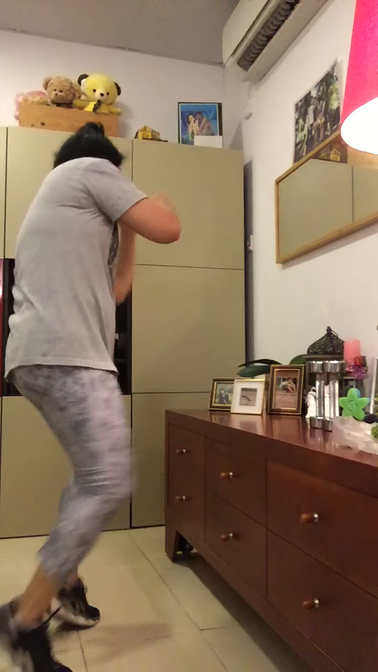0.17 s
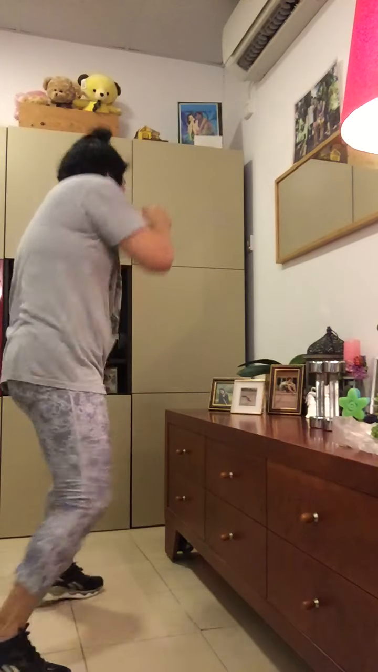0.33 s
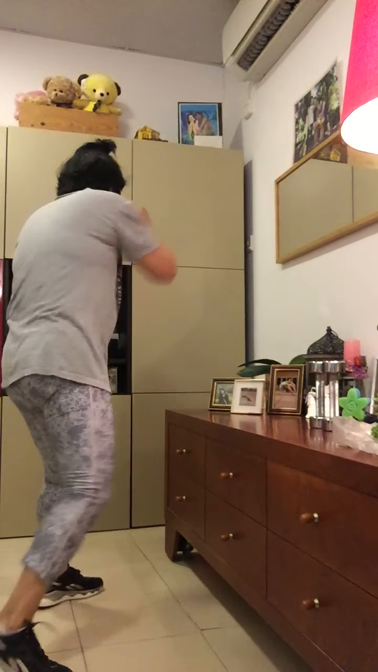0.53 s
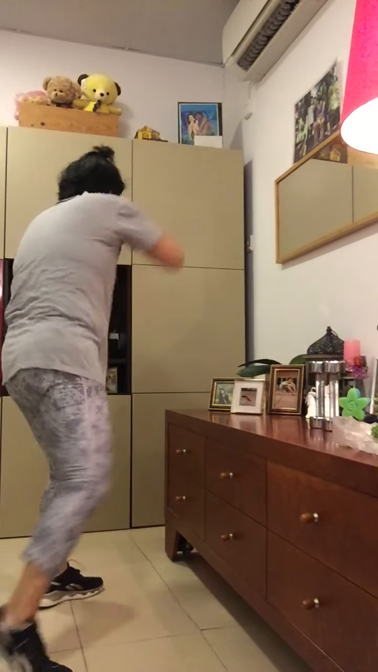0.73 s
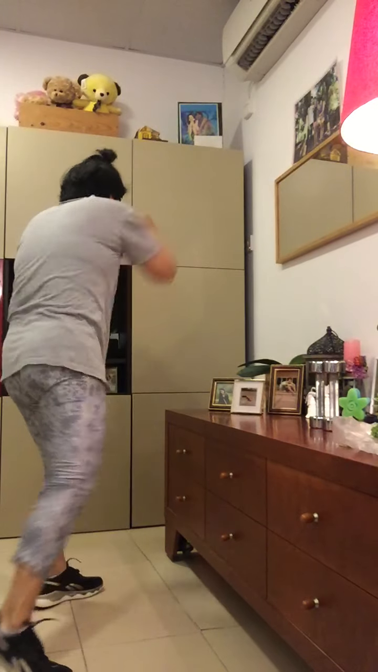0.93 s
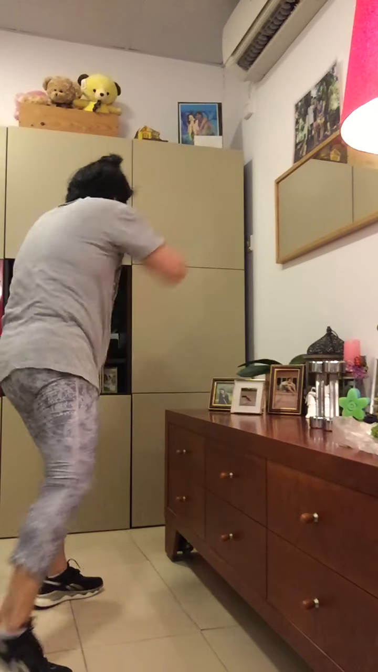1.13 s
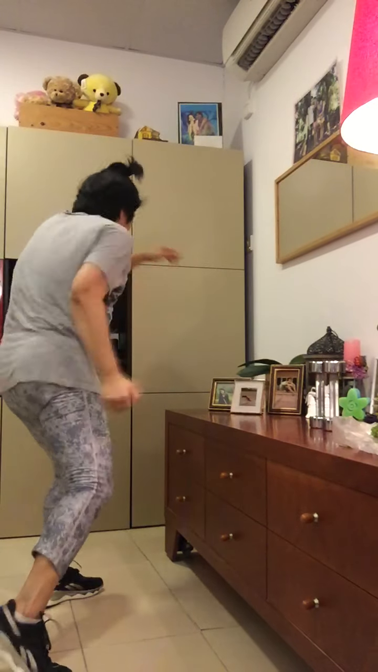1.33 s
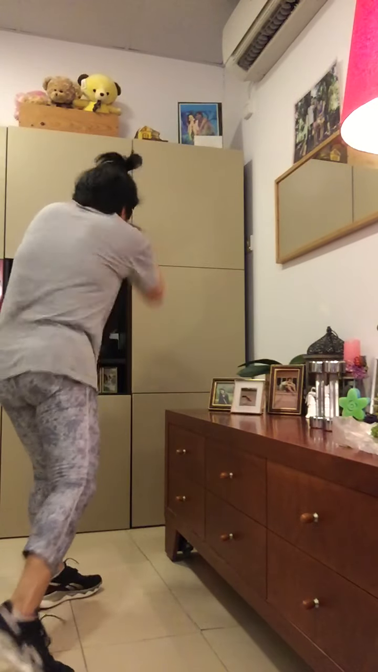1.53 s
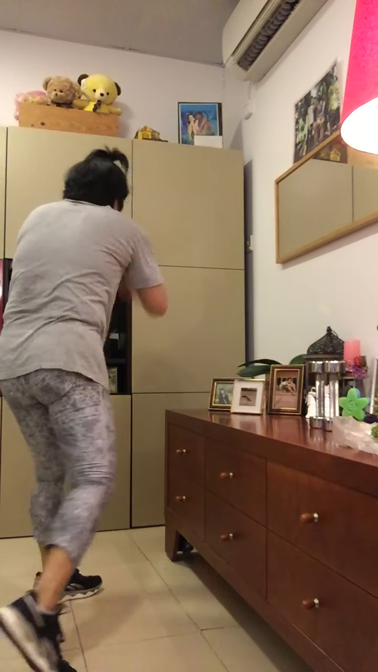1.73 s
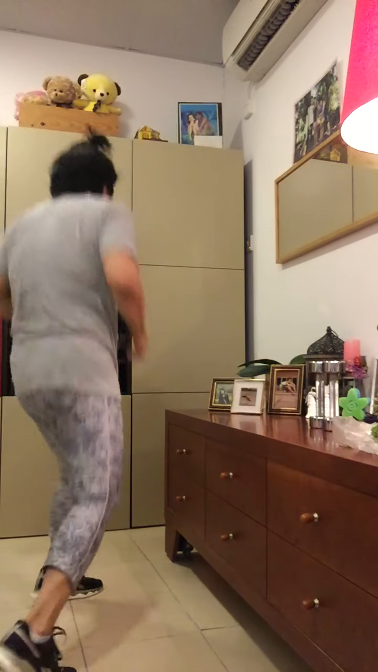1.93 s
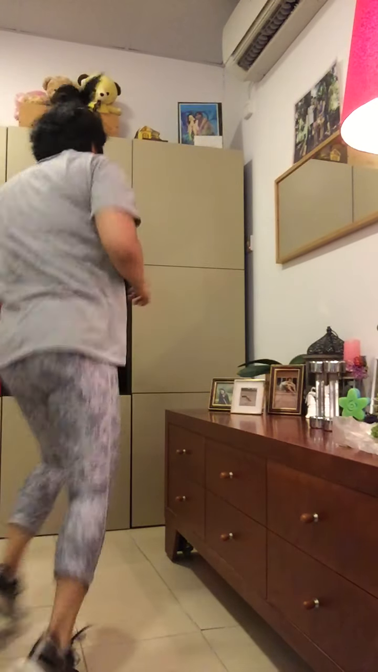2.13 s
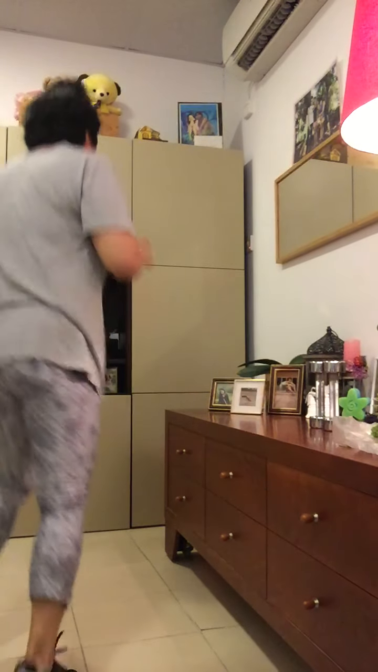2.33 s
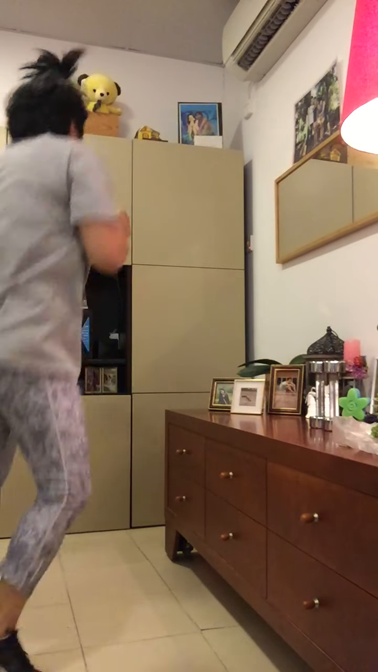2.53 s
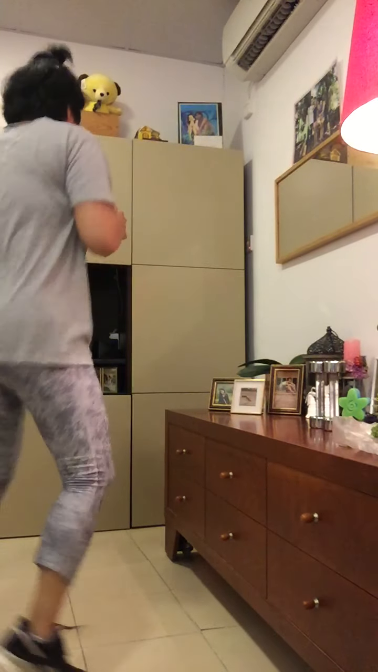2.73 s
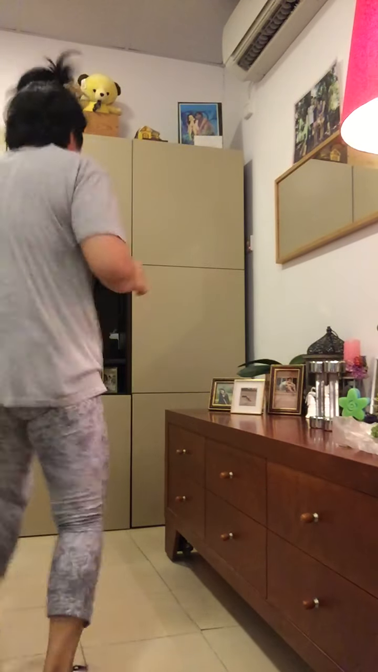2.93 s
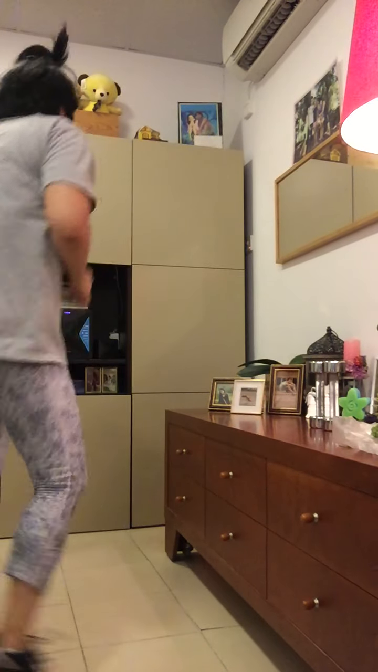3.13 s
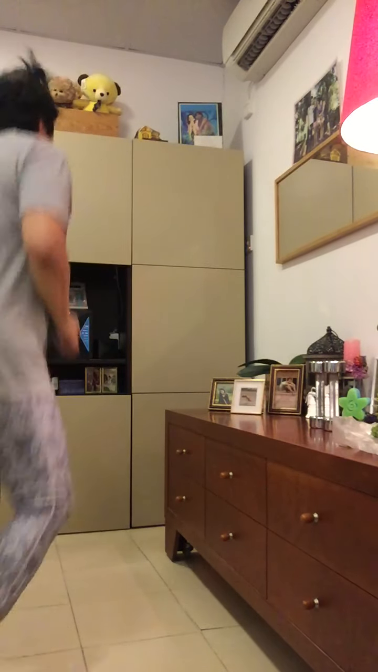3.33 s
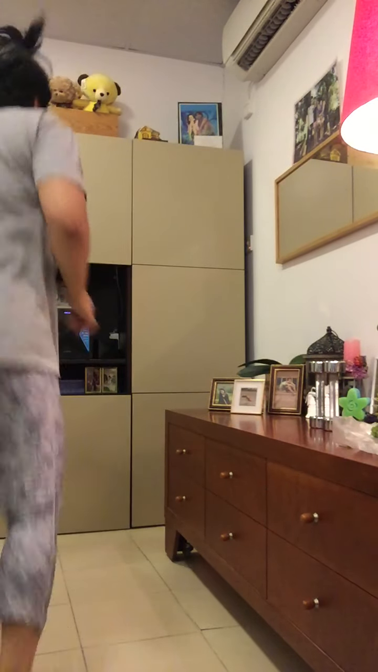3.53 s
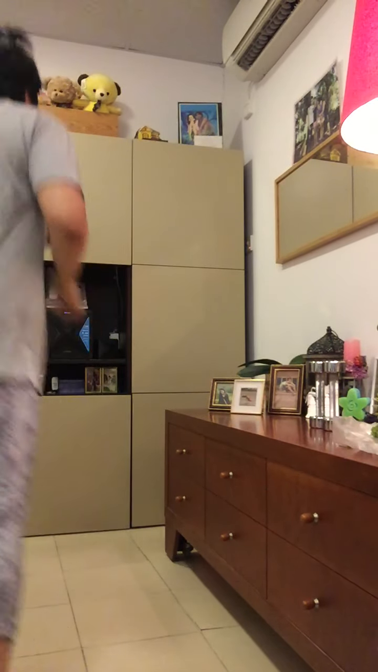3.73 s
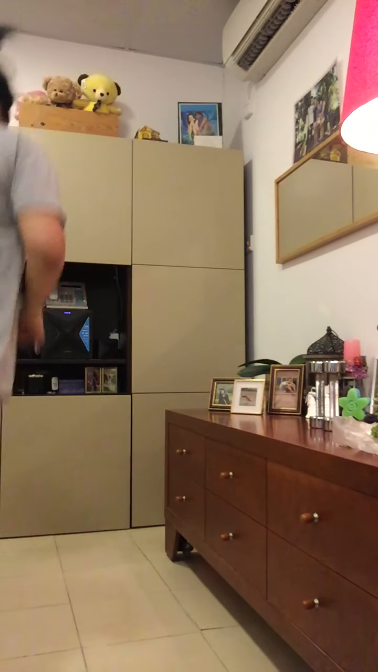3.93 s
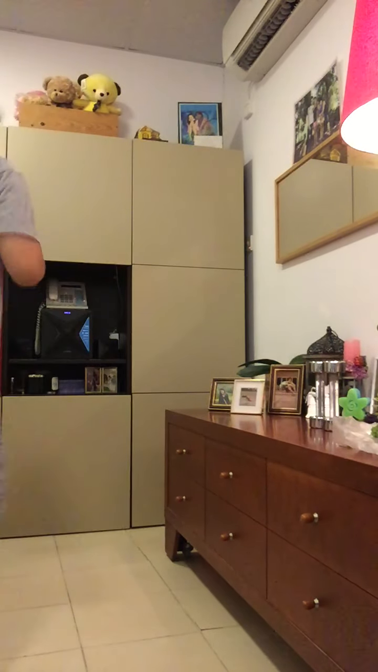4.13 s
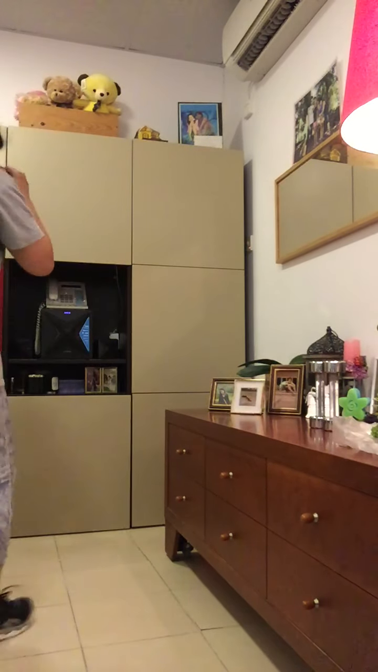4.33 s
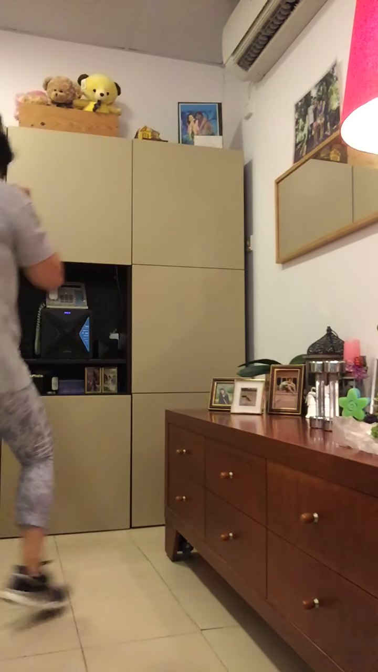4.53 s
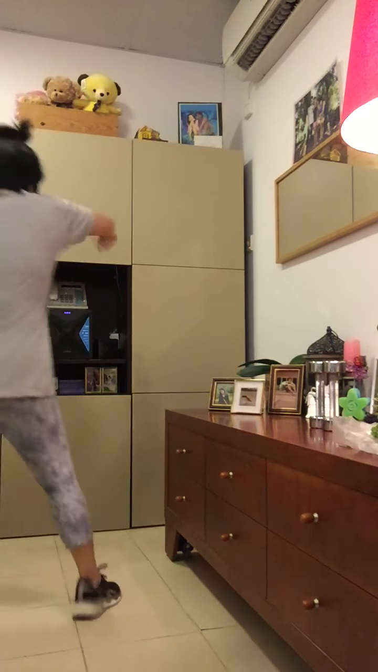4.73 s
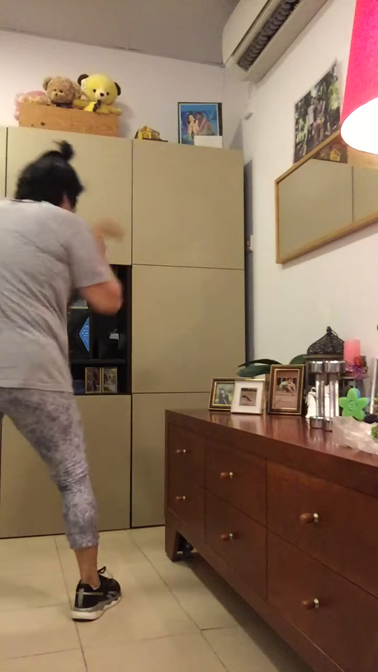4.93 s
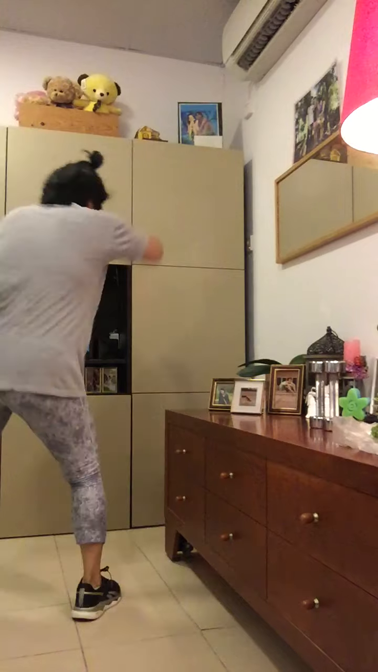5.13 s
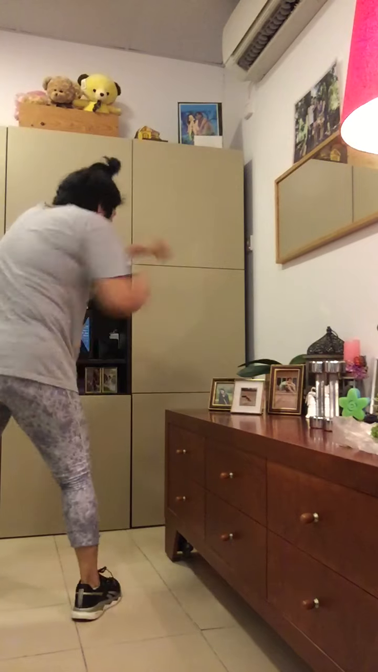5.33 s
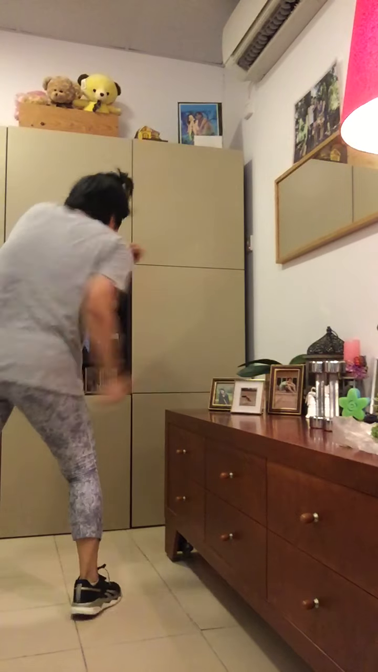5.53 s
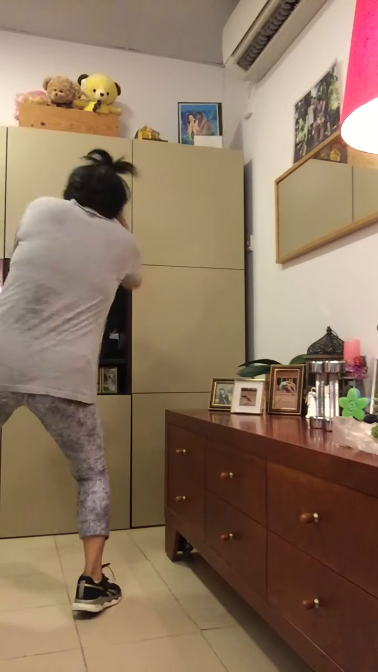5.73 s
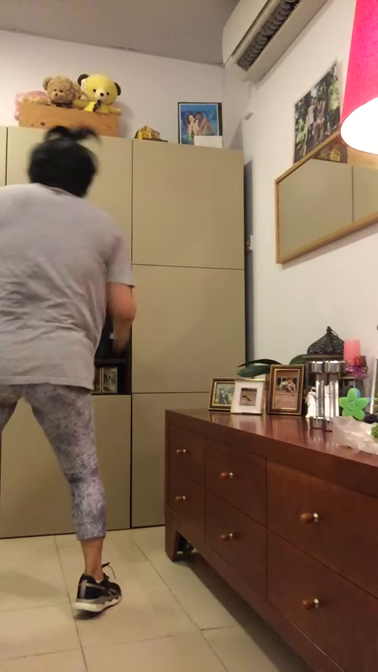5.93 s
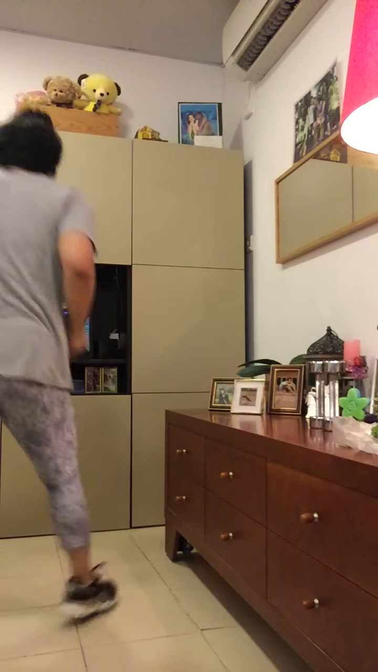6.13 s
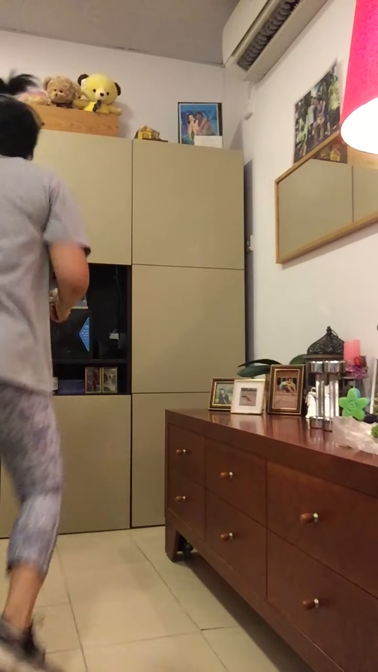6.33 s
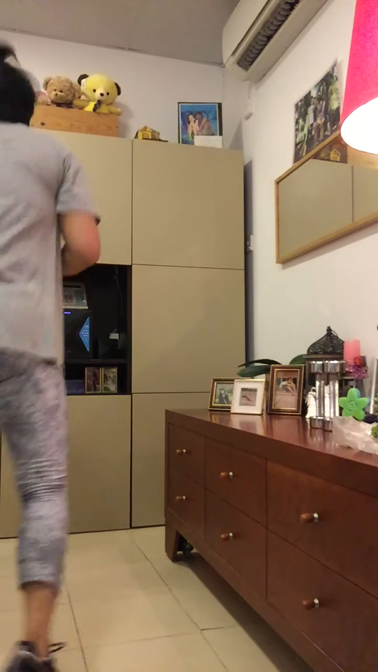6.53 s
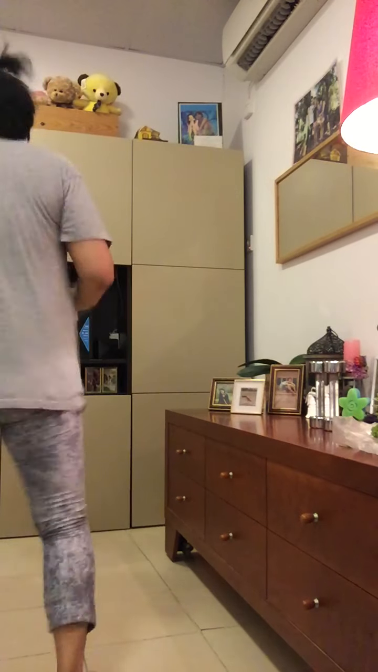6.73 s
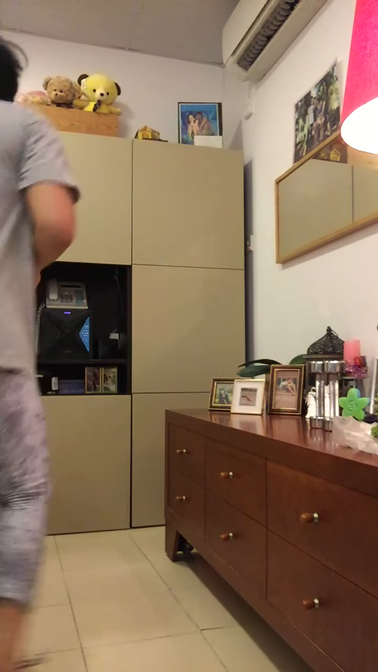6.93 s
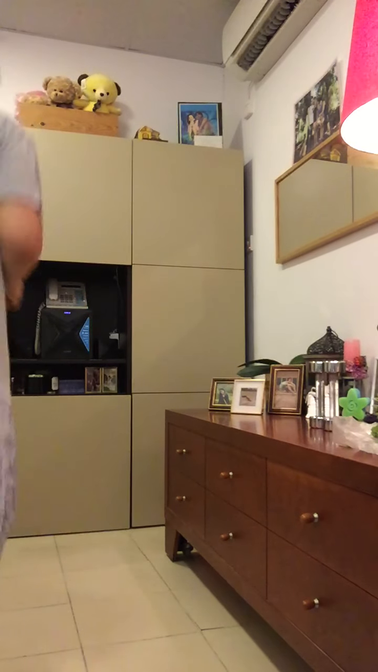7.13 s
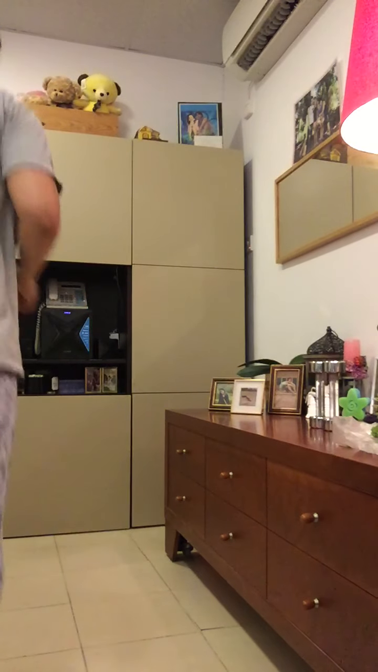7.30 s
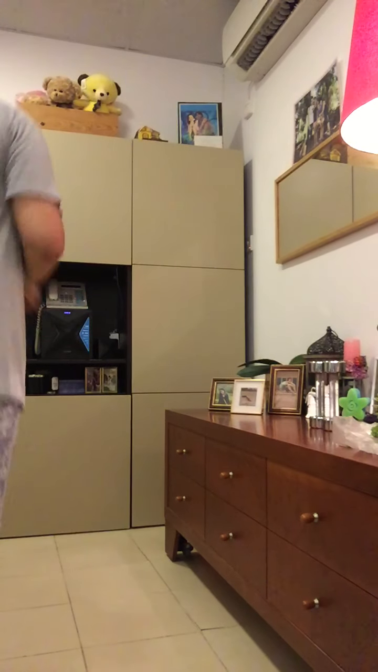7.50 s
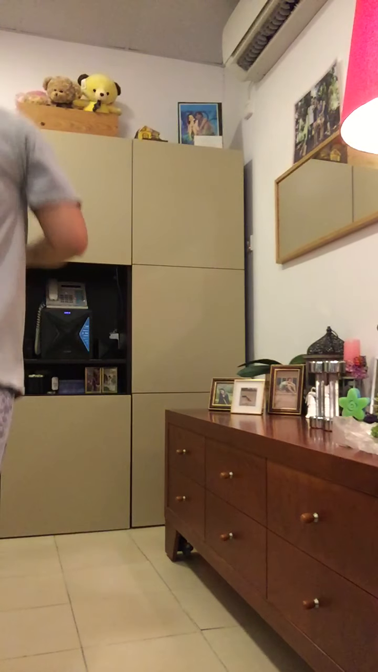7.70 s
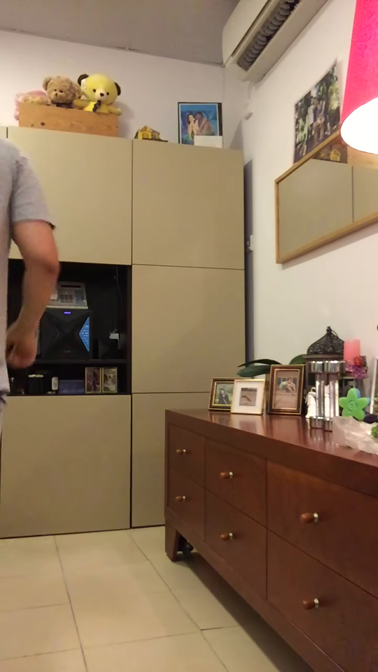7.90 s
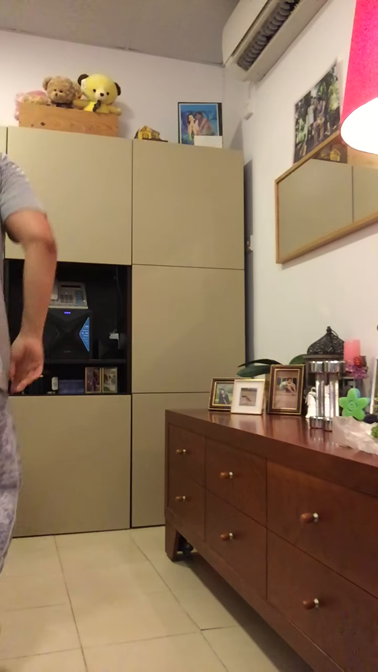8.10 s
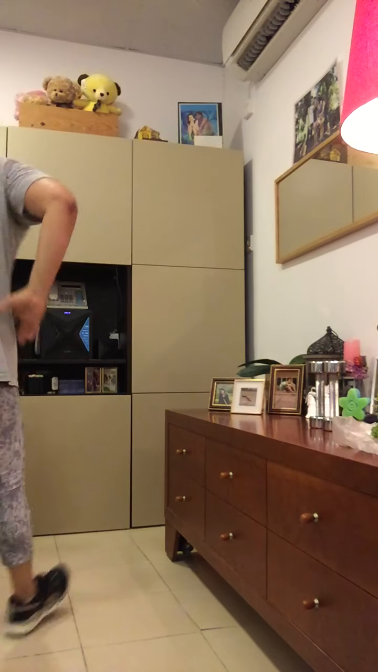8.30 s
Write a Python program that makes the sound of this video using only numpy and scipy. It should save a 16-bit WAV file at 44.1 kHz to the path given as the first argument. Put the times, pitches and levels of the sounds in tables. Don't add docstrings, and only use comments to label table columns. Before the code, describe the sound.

Someone in rubber-soled trainers works out on a tiled floor. Faint scuffs and light taps open, with one tiny sharp tick, then a bright double squeak and firm steps near two and a half seconds. More squeaks and slaps follow around four, a near-quiet stretch, then a busy burst near seven and soft taps to finish. Small hard room, close reflections, low air hum, microphone a few steps away.

```python
import sys
import numpy as np
from scipy import signal
from scipy.fft import rfft, irfft, next_fast_len
from scipy.io import wavfile
from scipy.ndimage import uniform_filter1d, map_coordinates

SR = 44100
rng = np.random.default_rng(int(sys.argv[2]) if len(sys.argv) > 2 else 0)


def voltage_ratio(level):
    return 10 ** (np.asarray(level, float) / 20)


def dump_mix(stems):
    frames = np.atleast_2d(stems).T
    limited = np.clip(frames, -1, 1)
    pcm = np.round(limited * 32767).astype(np.int16)
    wavfile.write(sys.argv[1], SR, pcm)


N = 373086
SHORT, LONG = 4096, 8192
TOP_HZ = 15850

# start in seconds, length in seconds, pitch in Hz, glide as a share of the pitch, level in dB.
THIN_CHIRPS = [
    (0.019, .018, 3210, -.04, -55),
    (.37, 0.0049, 3420, -0.012, -26.5),
    (3.156, 0.01, 3150, -.14, -30),
    (6.647, 0.0047, 2620, -0.1, -27.5),
    (3.939, 0.023, 5640, 0.014, -43),
    (7.329, .013, 4140, -0.063, -46),
]
MID_CHIRPS = [
    (3.173, 0.011, 2767, .016, -30),
    (6.986, 0.006, 2640, 0.098, -37.5),
    (6.993, 0.0056, 2982, -0.084, -26),
    (7.324, 0.02, 2705, -0.13, -25.5),
]
FIRM_CHIRPS = [
    (3.844, .031, 2557, -.24, -22),
    (4.477, 0.0218, 3283, .03, -27),
]
FULL_CHIRPS = [
    (2.482, 0.021, 2611, 0.057, -18),
    (2.496, 0.013, 2787, 0.06, -18.5),
    (3.842, 0.0062, 2620, -.05, -27),
]
# lower edge in Hz, upper edge in Hz.
BANDS = [(210, 500), (480, 1250), (1450, 3750), (4100, 6700), (7500, 14500)]
# time in seconds, rubbing level in dB.
EFFORT = [(0.0, -75), (.42, -59.5), (1.01, -86.5), (1.36, -73), (1.53, -70.5), (2.07, -65.5), (2.54, -59),
          (3.63, -65.5), (3.9, -58.5), (4.29, -66.5), (5.3, -77.5), (5.73, -70), (6.29, -77), (6.86, -52.5),
          (7.16, -68.5), (7.44, -62.5), (7.66, -74.5), (8.46, -74.5)]


def unit(x):
    return x / np.sqrt(np.mean(x ** 2) + 1e-20)


def along(points, hz):
    f, v = np.transpose(points)
    return np.interp(np.log(hz + 1), np.log(f + 1), v)


def effort_curve():
    s, level_db = np.transpose(EFFORT)
    return np.interp(np.arange(N) / SR, s, level_db)


def wobble(rate, size=N):
    return map_coordinates(rng.standard_normal(size // 8), [np.arange(size) * rate / SR])


def band(x, edges):
    return signal.sosfilt(signal.butter(3, edges, "band", fs=SR, output="sos"), x)


def add(track, s, sound, wet_db):
    # frequency in Hz, decay time to -60 dB in seconds.
    decay_times = [(150, 0.27), (600, 0.29), (2500, 0.3), (6000, 0.32), (12000, 0.25)]
    # delay in seconds, level in dB.
    wall_echoes = [(.0035, -10), (.0078, -5), (.0115, -7), (.015, -6.5), (.021, -14)]
    hz, t, z = signal.stft(rng.standard_normal(SR // 3), SR, nperseg=256)
    z = z * voltage_ratio(-60 * t / along(decay_times, hz)[:, None])
    response = signal.istft(z, SR, nperseg=256)[1]
    response *= 1 - np.exp(-(np.arange(len(response)) / SR / 0.012) ** 2)
    response *= voltage_ratio(wet_db) / np.linalg.norm(response)
    response[0] = 1
    for delay, db in wall_echoes:
        path_s = delay * (.94 + .12 * rng.random())
        response[round(path_s * SR)] += voltage_ratio(db) * np.sign(rng.standard_normal())
    start = round(s * SR)
    heard = signal.fftconvolve(sound, response)[:N - start]
    heard *= np.linalg.norm(sound) * np.linalg.norm(response) / np.linalg.norm(heard)
    track[start:][:len(heard)] += heard


def slips():
    # start in seconds, length in seconds, pitch in Hz, glide as a share, level in dB.
    shrill_chirps = [
        (4.473, 0.012, 3034, 0.011, -28),
    ]
    split_chirps = [
        (.372, 0.017, 1575, -0.041, -49.5),
    ]
    rasp_chirps = [
        (3.5, .023, 3750, -0.28, -40),
    ]
    scuff_chirps = [
        (1.327, .087, 1341, 0.193, -48),
    ]
    rough_chirps = [
        (3.77, 0.026, 2100, 0.043, -54.5),
        (1.73, 0.056, 1550, 0.052, -46.5),
    ]
    return [(THIN_CHIRPS, .035, (-28, -33, -50, -50.5, -53, -60)),
            (MID_CHIRPS, .04, (-20, -18, -36, -52, -43, -52)),
            (FIRM_CHIRPS, .045, (-21, -8.0, -22.5, -35, -52, -50)),
            (FULL_CHIRPS, .04, (-21, -2.0, -16, -31, -32.5, -41)),
            (shrill_chirps, .015, (-27, 2.0, 5.5, -4.5, -8.5, -60)),
            (split_chirps, .035, (-17, 0, 19.0, -15, -2.0, -5.5)),
            (rasp_chirps, .11, (-35, -27, -41, -43, -56, -68)),
            (scuff_chirps, .09, (-17, -6.5, -16, -34, -34, -40)),
            (rough_chirps, .14, (-19, 3.5, -11, -21, -45, -50))]


def chirp(length, hz, glide, db, unsteady, partials):
    orders = np.array([1, 1.5, 2, 3, 4, 5, 6])[:, None]
    u = np.arange(SHORT) / SR / length
    pitch = hz * (1 + glide * (u - .5) + unsteady * wobble(700, SHORT))
    phase = 2 * np.pi * np.cumsum(pitch) / SR
    audible = orders * pitch < TOP_HZ
    stack = voltage_ratio(np.r_[0, partials]) @ (np.sin(orders * phase) * audible)
    stack *= 1 + 2.3 * unsteady * wobble(2000, SHORT)
    grip = np.clip(np.minimum(3.6 * u, 4.0 * (1 - u)), 0, 1)
    uneven = grip * voltage_ratio(2.5 * wobble(350, SHORT))
    grip = uneven * np.linalg.norm(grip) / np.linalg.norm(uneven)
    return voltage_ratio(db - 4.5) * grip * stack


def squeaks():
    out = np.zeros(N)
    for rows, unsteady, partials in slips():
        for s, length, hz, glide, db in rows:
            add(out, s, chirp(length, hz, glide, db, unsteady, partials), wet_db=-2.0)
    return out


def whistles():
    # start in seconds, length in seconds, pitch in Hz, level in dB.
    turns = [
        (0.164, 0.049, 1590, -62),
        (1.664, .03, 5850, -69),
        (5.497, 0.13, 1624, -62.5),
        (5.824, 0.095, 1640, -64),
        (6.629, 0.064, 5400, -53),
        (6.95, .06, 1620, -66),
        (7.98, 0.046, 1250, -60),
        (8.41, 0.016, 1160, -60.5),
    ]
    out = np.zeros(N)
    for s, length, hz, db in turns:
        u = np.arange(LONG) / SR / length
        tone = np.sin(2 * np.pi * np.cumsum(hz * (1 + 0.014 * wobble(146, LONG))) / SR)
        swell = np.sin(np.pi * np.clip(u, 0, 1))
        add(out, s, voltage_ratio(db - 8 + 3.3 * wobble(65, LONG)) * swell * tone, wet_db=5.5)
    return out


def contacts():
    # start in seconds, slap level in dB, pitch of the sole's ring in Hz,
    # weight (thump over slap) in dB.
    crisp = [(0.2479, -43.5, 1440, 5), (0.2735, -41.5, 3560, -6), (0.798, -54.5, 2740, -9),
             (1.3194, -65, 1420, 7.5), (1.726, -41, 1740, -17), (2.5506, -30.5, 2730, -12.5),
             (2.8747, -29.5, 3100, -5.5), (3.2317, -36, 1610, 2), (4.4737, -31.5, 3110, -10),
             (6.0698, -53, 1970, 12), (6.8779, -42.5, 1590, -16), (7.8385, -45.5, 3480, -7),
             (8.405, -56, 3930, -15)]
    soft = [(1.953, -46.5, 1866, -7), (2.085, -42, 2920, -16), (2.287, -46, 2820, -3),
            (2.9344, -38, 2260, -2), (3.9492, -33.5, 2590, -8.5), (4.0691, -48.5, 2540, 6),
            (4.1098, -54, 3550, -11), (4.8124, -33.5, 2240, -3.5), (4.8775, -34.5, 3430, -7),
            (5.1248, -59, 2093, -10), (6.098, -41.5, 2140, -21), (6.4794, -38, 2880, -7.5),
            (6.714, -32.5, 1461, -8), (7.1416, -40.5, 2840, -8), (7.227, -51, 2550, -21),
            (7.8817, -53, 2760, 3), (3.585, -41, 2520, 2.8)]
    flat = [
        (1.0724, -73.5, 1570, 18),
        (3.3027, -43.5, 1550, -19),
        (3.6554, -39.5, 3960, 0),
        (6.787, -34.5, 3530, -5.5),
        (7.0524, -33, 2140, -7),
        (7.4428, -36.5, 4200, -2.5),
    ]
    # start in seconds, length in seconds, slap level in dB, weight in dB.
    gritty = [(.021, .06, -72.5, -12), (.344, 0.024, -70.5, -7), (.53, 0.028, -62.5, -28),
              (2.068, 0.044, -63, -2), (3.33, 0.024, -66, -12), (4.188, .042, -66, -5),
              (5.519, 0.0706, -65, 1), (5.692, 0.054, -75.5, -11), (6.207, 0.024, -55.5, -4.5),
              (6.621, 0.03, -66, -16), (7.299, 0.0172, -70, -31), (7.574, 0.0374, -66.5, -4)]
    smooth = [
        (1.499, .059, -71, -19),
        (1.655, 0.061, -69, 4.5),
        (2.209, 0.055, -69.5, -1),
        (2.395, .033, -61.5, -10),
        (2.684, 0.021, -70, -7),
        (3.077, .031, -65.5, -18.5),
        (3.417, 0.028, -62, -12),
        (6.96, 0.034, -64.5, -28),
        (8.028, 0.063, -66, -8),
    ]

    def struck(rows, length, thump_db, knock_db, grit_db):
        return [(s, length, db - 17, hz, weight + thump_db, knock_db, grit_db) for s, db, hz, weight in rows]

    def dragged(rows, knock_db, grit_db):
        return [(s, length, db, 2399, weight, knock_db, grit_db) for s, length, db, weight in rows]

    scraping = THIN_CHIRPS + MID_CHIRPS + FIRM_CHIRPS + FULL_CHIRPS
    skids = [(s - .008, 0.064, db - 36.5, -17) for s, _, _, _, db in scraping]
    return (struck(crisp, .009, thump_db=2.5, knock_db=2.55, grit_db=-10.5)
            + struck(soft, .012, thump_db=1.0, knock_db=1.4, grit_db=-19)
            + struck(flat, 0.0089, thump_db=5.5, knock_db=-8.5, grit_db=-13)
            + dragged(gritty, knock_db=-0.2, grit_db=-3)
            + dragged(smooth, knock_db=4.5, grit_db=-13)
            + dragged(skids, knock_db=2.5, grit_db=0.0))


def taps():
    out, t = np.zeros(N), np.arange(SHORT) / SR
    ring_width = 1.25
    slowness = (2.3, 1.7, 1, 0.92, 0.26, 1.44)
    for s, length, slap_db, ring_hz, weight_db, knock_db, grit_db in contacts():
        thump_db = slap_db + weight_db
        fizz_db = slap_db + grit_db - 14
        levels_db = [thump_db, thump_db + knock_db, slap_db, slap_db + grit_db, fizz_db, slap_db - 2.5]
        ring = (ring_hz / ring_width, ring_hz * ring_width)
        blow = np.zeros(SHORT)
        for edges, level_db, slower in zip([*BANDS, ring], levels_db, slowness):
            u = t / (0.086 * slower * length + 1e-5)
            patch = np.array(edges) * voltage_ratio(.3 * rng.standard_normal())
            part = band(rng.standard_normal(SHORT) * u ** 2 * np.exp(-u), patch)
            blow += voltage_ratio(level_db + 29) * part / np.linalg.norm(part)
        add(out, s, blow, wet_db=0.76)
    return out


def grains(edges):
    grain_db = 0.83 * wobble(40) + 0.87 * wobble(400)
    return unit(band(voltage_ratio(grain_db) * rng.standard_normal(N), edges))


def brush():
    dull, rub, hiss = [grains(edges) for edges in BANDS[1:4]]
    return voltage_ratio(effort_curve() - 8) * (rub + voltage_ratio(-3) * dull + voltage_ratio(-12) * hiss)


def rush(spectrum, patchy_db):
    hz, _, z = signal.stft(rng.standard_normal(N), SR, nperseg=8192)
    field = uniform_filter1d(rng.standard_normal(z.shape), size=40, axis=0)
    field = uniform_filter1d(field, size=2, axis=1)
    z = z * voltage_ratio(patchy_db * unit(field) + along(spectrum, hz)[:, None])
    return unit(signal.istft(z, nperseg=8192)[1][:N])


def air():
    # frequency in Hz, density in dB per Hz.
    air_spectrum = [(22, -72), (36, -13.5), (48, -4.5), (75, -8.5), (160, -11), (300, -16.5), (430, -25),
                    (500, -29), (1000, -28.5), (2500, -33.5), (5000, -37.5), (6500, -36), (10500, -44),
                    (16000, -46)]
    stir_spectrum = [(22, -59), (36, -22.5), (44, -0.5), (53, 1.5), (66, -12.5), (110, -13.5), (155, -6.5),
                     (260, -23.5), (420, -18.5), (500, -42.5), (900, -92.5)]
    effort_db = effort_curve()
    gusts_db = 1.5 * wobble(3) + 2.5 * wobble(8)
    stir_db = -61.5 + 0.43 * (effort_db - effort_db.mean()) + gusts_db
    stir = voltage_ratio(stir_db) * rush(stir_spectrum, patchy_db=2.0)
    return voltage_ratio(-64) * rush(air_spectrum, patchy_db=1.6) + stir


def scene():
    return (squeaks() + whistles() + taps() + brush() + air())[None]


def low_pass(x):
    return signal.sosfilt(signal.butter(12, 16790, fs=SR, output="sos"), x)


def record(dry):
    size = next_fast_len(N)
    passed = np.fft.rfftfreq(size, 1 / SR) < TOP_HZ
    kept = irfft(rfft(dry, size) * passed, size)[:, :N]
    return low_pass(kept)


dry = scene()
out = record(dry)
dump_mix(out)
```